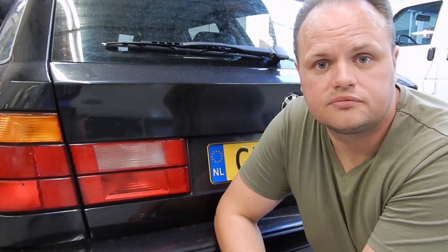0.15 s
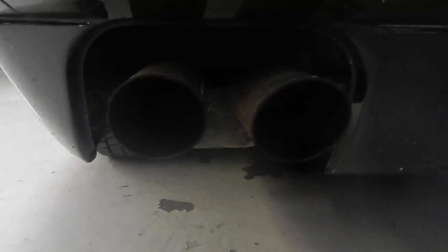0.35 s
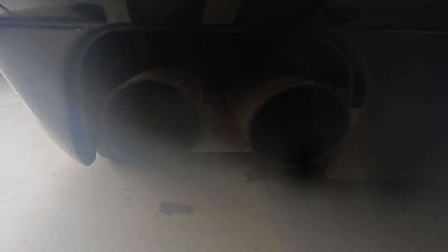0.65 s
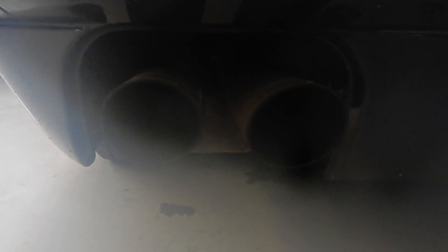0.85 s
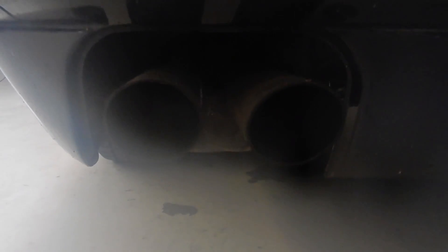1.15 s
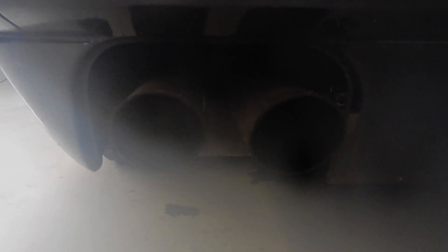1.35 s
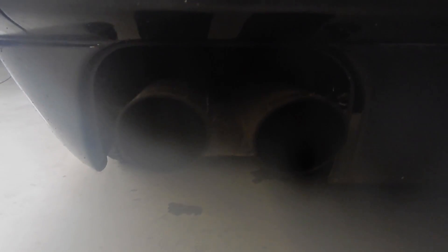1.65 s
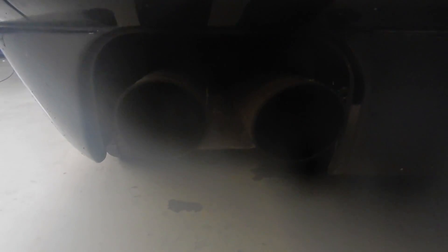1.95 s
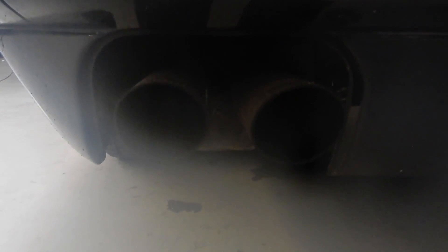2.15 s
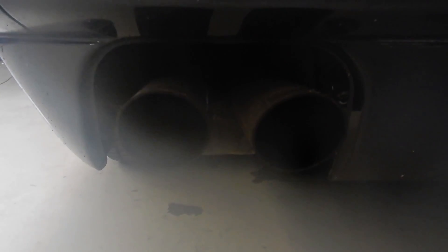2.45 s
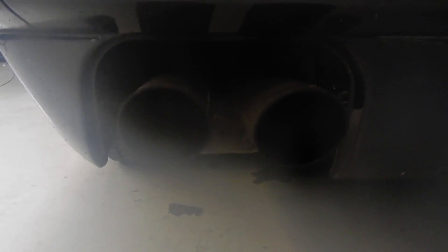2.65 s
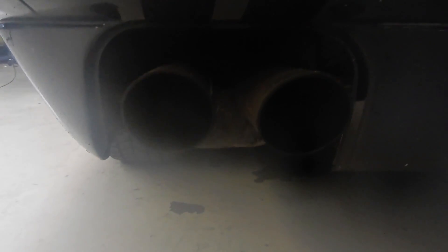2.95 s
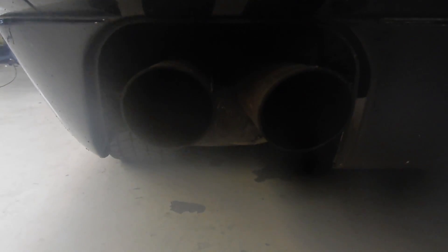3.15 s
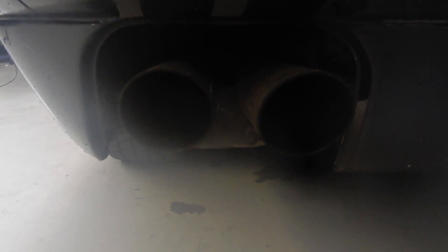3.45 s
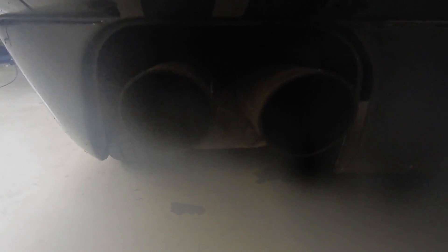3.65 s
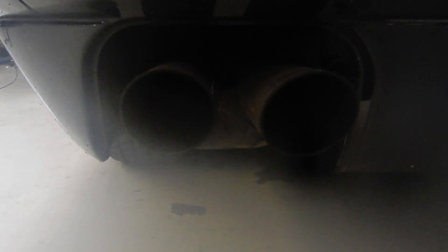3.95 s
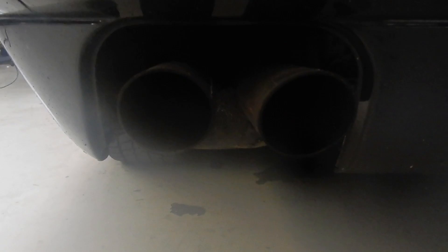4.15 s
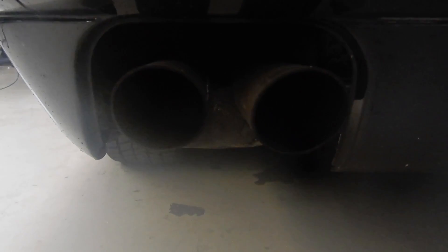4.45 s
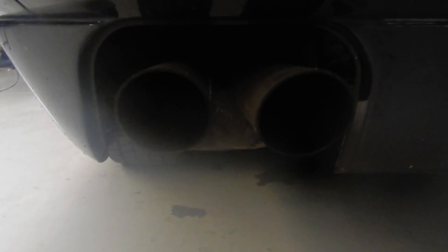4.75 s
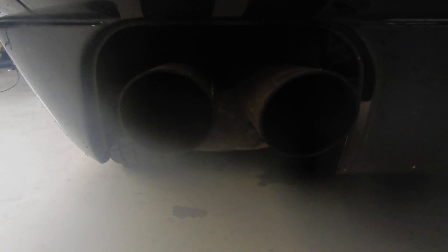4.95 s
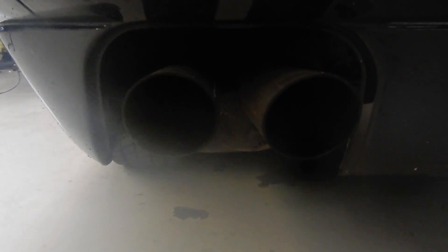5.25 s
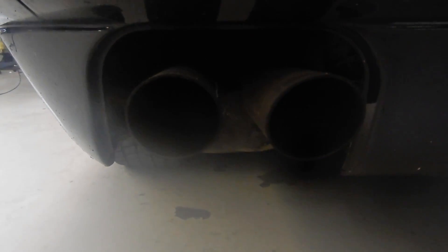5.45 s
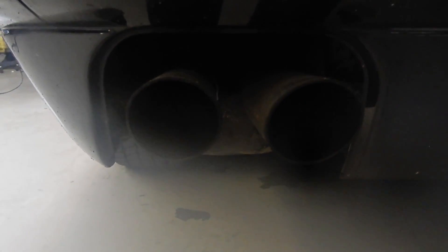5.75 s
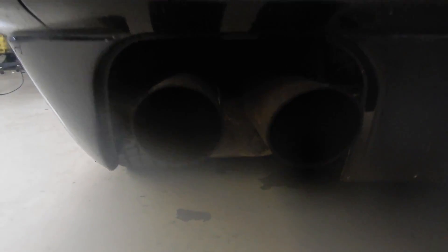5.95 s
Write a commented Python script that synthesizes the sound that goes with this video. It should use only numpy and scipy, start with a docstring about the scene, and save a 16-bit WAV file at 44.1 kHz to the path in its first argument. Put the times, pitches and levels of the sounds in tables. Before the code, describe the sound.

A car exhaust idles with a low throb and hiss, misfiring in bouts of deep thumps and puffs that buffet the microphone.

```python
"""A six-cylinder car throbs and hisses at idle, heard a hand's width behind its twin tailpipes.
Each exhaust beat rings the pipes under a steady hiss of gas. Soon the engine starts to misfire:
each miss slows the crank and gives a deep thump and a hollow hoot. About an eighth of a second later
a puff of gas buffets the microphone, and the limiter turns down the idle, which then swells back."""
import sys
import numpy as np
from scipy import signal
from scipy.fft import rfft, irfft
from scipy.io import wavfile
from scipy.ndimage import uniform_filter1d, minimum_filter1d

SR = 44100
rng = np.random.default_rng(int(sys.argv[2]) if len(sys.argv) > 2 else 0)


def unload_audio(sound):
    """Save the sound as a 16-bit wav file, at the path given as the first command line argument."""
    columns = np.transpose(np.atleast_2d(sound))
    # keep every value between -1 and 1, then stretch to whole-number steps
    steps = np.round(np.clip(columns, -1, 1) * 32767)
    wavfile.write(sys.argv[1], SR, steps.astype(np.int16))


N = 268524
T = np.arange(N) / SR
HZ = np.fft.rfftfreq(N, 1 / SR)


def amp(db):
    """Turns decibels into a gain."""
    return 10 ** (np.asarray(db) / 20)


def unit(x):
    """Scales a sound to an average (rms) level of 1."""
    return x / np.sqrt(np.mean(x ** 2) + 1e-20)


def read(points, hz):
    """Reads between the rows of a table, on a log-frequency axis."""
    f, value = np.transpose(points)
    return np.interp(np.log(hz + 1), np.log(f + 1), value)


def add(mix, s, sound):
    """Mixes a sound in, starting at s seconds."""
    part = mix[..., round(s * SR):][..., :sound.shape[-1]]
    part += sound[..., :part.shape[-1]]


def noise(gain, likeness):
    """Stereo noise with a given spectrum; a likeness of 1 makes left and right the same."""
    a, b = rfft(rng.standard_normal((2, 2 * len(gain) - 2)))
    likeness = np.clip(likeness, 0, 1)
    shared, apart = np.sqrt(1 + likeness) * a, np.sqrt(1 - likeness) * b
    return unit(irfft(np.array([shared + apart, shared - apart]) * gain))


def swell(t, rise):
    """Rises to 1 at the rise time, then dies away."""
    u = np.maximum(t, 0) / rise
    return (u * np.exp(1 - u)) ** 2


# thin, high tones across the pipe mouths: f/Hz, relative level/dB
WHISTLE_TONES = [(7693, -76), (8059, -79), (9157, -77), (9286, -78), (9641, -79), (10255, -79),
                 (11612, -78)]

def whistles(width_hz=26, level_db=-56):
    """Flowing gas faintly sounds narrow resonances across the pipe mouths."""
    peaks = sum(amp(db) / (1 + (2 * (HZ - hz) / width_hz) ** 2) for hz, db in WHISTLE_TONES)
    return amp(level_db) * noise(peaks, likeness=.52)


# when the pipe ticks: t/s, level/dB
TICKS = [(5.4559, -11.5)]
# the tones in a tick: f/Hz, level/dB, fade time/s
TICK_TONES = [(2350, -7, 0.0019), (3020, 1, 0.0017), (4100, -3, 0.00074), (5400, 1, 0.000398),
              (7500, -6, 0.0004)]

def ticks():
    """The pipe gives a short metallic snap."""
    out, t = np.zeros(N), T[:2048]
    snap = sum(amp(db) * np.exp(-t / fade) * np.sin(2 * np.pi * hz * t) for hz, db, fade in TICK_TONES)
    for s, db in TICKS:
        add(out, s, amp(db) * snap)
    return out


# misfires, in bouts of one every engine cycle: t/s, thump level/dB, spit and hoot level/dB
MISFIRES = [(.528, 2, -2.5), (.7, 2, 2), (.873, 3, 1), (1.212, 2, -2), (1.385, 1, 0), (1.558, 4, -1),
            (1.727, 1.5, -2.5), (1.902, 1.5, -1.5), (2.074, 1.5, -2), (2.242, 3, 0), (2.418, 3, 0.5),
            (2.591, 2.5, 1.5), (2.762, 2, -0.5), (2.932, 3, 0.5), (3.579, 2, -2), (3.747, 3, -0.5),
            (4.077, 1.5, 2), (4.246, 2.5, 0.5), (4.414, 2.5, -2), (4.751, 2, -2), (4.919, 1, 0.5),
            (5.083, 2, -2)]
MISFIRE_TIMES = np.transpose(MISFIRES)[0]
IDLE_CYCLE_S, MISFIRE_CYCLE_S = .156, .171  # a cycle takes longer when a cylinder misses

def beat_times():
    """Three strong beats a cycle; the crank is slow in a bout and takes one cycle to speed up again."""
    changing_s = (IDLE_CYCLE_S + MISFIRE_CYCLE_S) / 2
    bout_ends = MISFIRE_TIMES[np.diff(MISFIRE_TIMES, append=np.inf) > 1.5 * MISFIRE_CYCLE_S]
    # a whole number of cycles passes between one mark and the next
    marks = sorted([MISFIRE_TIMES[0] - changing_s, *MISFIRE_TIMES, *(bout_ends + changing_s)])
    marks.append(marks[-1] + IDLE_CYCLE_S * np.ceil((T[-1] - marks[-1]) / IDLE_CYCLE_S))
    cycles = np.cumsum(np.round(np.diff(marks, prepend=marks[0]) / IDLE_CYCLE_S))
    return np.interp(np.arange(3 * cycles[-1]) / 3, cycles, marks)


def stumble_db(s, weak_db=-5):
    """The two beats that follow a misfire are weak."""
    since = s - MISFIRE_TIMES
    return weak_db * np.any((since > MISFIRE_CYCLE_S / 6) & (since < MISFIRE_CYCLE_S * 5 / 6))


# pitches at which the steel pipe ends ring: f/Hz, width/Hz, boost/dB
STEEL_RINGS = [(1215, 45, 6), (2066, 70, 1.5), (2257, 60, 3), (2580, 70, 3.5), (3756, 40, 3), (4640, 30, 4)]

def tailpipe(round_trip_hz=253, loss_hz=2200):
    """Echoes between the pipe's ends boost evenly spaced pitches; the steel adds its own."""
    echo = .54 / (1 + (HZ / loss_hz) ** 2)  # weaker in the treble
    steel_db = sum(db / (1 + (2 * (HZ - hz) / width) ** 2) for hz, width, db in STEEL_RINGS)
    return amp(steel_db) / abs(1 - echo * np.exp(-2j * np.pi * HZ / round_trip_hz))


# tone of the gas (low rush, bright hiss, steady top fizz, short spit): f/Hz, relative level/dB
RUSH_TONE = [(25, -43.5), (70, 5), (150, 1.5), (260, -18.5), (320, -3), (390, 2.5), (500, -11), (660, -6),
             (760, -18.5), (880, -8), (1010, -21.5), (1110, -8), (1230, -18), (1370, -47), (2000, -56.5)]
HISS_TONE = [(900, -14.5), (1400, 2.5), (1600, 4.5), (2250, 10), (2700, 8.5), (3500, 8.5), (5000, 1.5),
             (5500, -8), (7500, -36.5), (15000, -53)]
FIZZ_TONE = [(3500, -3.5), (5500, 3.5), (7500, 0), (11800, -5), (15000, -13)]
SPIT_TONE = [(200, -19.5), (700, -6), (1400, -7), (2500, 2.5), (3200, 0), (3700, -2.5), (5000, -8),
             (8000, -21.5), (15000, -44.5)]
# the slow drift of the hiss: t/s, level/dB
HISS_DRIFT = [(.36, -0.5), (.65, 2.5), (1.05, -3), (1.45, 0.5), (1.65, -1.5), (2.6, -1), (3.2, -1.5),
              (3.7, 1.5), (4.2, 1.5), (4.6, -1), (5.3, -1.5), (5.8, 1)]
# how alike the gas sounds left and right: f/Hz, likeness squared/0-1
GAS_LIKENESS = [(60, 0.81), (600, 0.95), (3000, 0.97), (4500, 0.83), (7000, 0.12), (15000, 0.14)]
# spits of gas after each misfire: delay/s, rise time/s, strength/ratio
SPITS = [(0.004, 0.0079, 0.8), (0.0447, 0.0058, 2.0), (.11, .005, .3)]
# the first misfire of most bouts coughs out more gas: t/s, level/dB
COUGHS = [(.526, -6), (3.576, -3.5), (4.074, -6), (4.747, -1)]

def gas(rush_db=-31, hiss_db=-36.5, fizz_db=-42, spit_db=-33, ripple_db=.76):
    """Swirling gas leaves the pipes, throbbing with the beats and spitting after each misfire."""
    t, throbs, spits = T[:SR // 8], np.zeros(N), np.zeros(N)
    for s in beat_times():
        add(throbs, s, swell(t, rise=.0092))
    for s, _, db in MISFIRES:
        for delay, rise, strength in SPITS:
            add(spits, s + delay, amp(db) * strength * swell(t, rise))
    for s, db in COUGHS:
        add(spits, s, amp(db) * swell(t, rise=.0068))
    likeness = np.sqrt(np.clip(read(GAS_LIKENESS, HZ), 0, 1))
    # standing waves in the silencer ripple the tailpipe's resonances
    ripple = unit(uniform_filter1d(rng.standard_normal(len(HZ)), size=200))
    colour = tailpipe() * amp(ripple_db * ripple)
    rush, hiss, fizz, spit = (noise(amp(read(tone, HZ)) * colour, likeness)
                              for tone in (RUSH_TONE, HISS_TONE, FIZZ_TONE, SPIT_TONE))
    drift_db = np.interp(T, *np.transpose(HISS_DRIFT))
    rush *= amp(rush_db) * (1 + .11 * throbs + .4 * spits)
    hiss *= amp(hiss_db + drift_db) * (1 + .22 * throbs)
    return rush + hiss + amp(fizz_db) * fizz + amp(spit_db) * spit * spits


# tone of the gas shoved out by a beat: f/Hz, relative level/dB
CHUG_TONE = [(60, -32.5), (110, -5), (180, 10), (215, -11.5), (265, -3.5), (320, -10), (420, -27.5),
             (500, -16), (620, -18), (1400, -54.5)]
# the three uneven beats of a cycle: level/dB
CHUG_LEVELS = [-21, -22, -32]

def chugs(rise_s=.014, lead_s=.002):
    """Each beat shoves out a short, hollow burst of gas."""
    out, t = np.zeros((2, N)), T[:4096]
    colour = amp(read(CHUG_TONE, np.fft.rfftfreq(len(t), 1 / SR)))
    shape = swell(t, rise_s)
    shape_rms = np.sqrt(np.mean(shape ** 2))
    for k, s in enumerate(beat_times()):
        burst = shape_rms * unit(noise(colour, likeness=.97) * shape)
        db = CHUG_LEVELS[k % len(CHUG_LEVELS)] + stumble_db(s)
        add(out, s - lead_s, amp(db) * burst)
    return out


# surges of gas after each misfire: delay/s, rise time/s, level/dB
SURGES = [(.007, .014, -1.5), (.044, .02, -4)]
# overtones of the tailpipe: f/Hz, level/dB
HOOT_TONES = [(510, -26), (762, -32), (1015, -39), (1222, -39.5)]

def hoots(scatter_db=2, detune=.012):
    """The surges of a misfire blow the overtones of the tailpipe: a hollow hoot."""
    out, t = np.zeros(N), T[:SR // 6]
    for s, _, db in MISFIRES:
        for delay, rise, surge_db in SURGES:
            tones = np.zeros(len(t))
            for hz, tone_db in HOOT_TONES:
                louder, sharper, phase = rng.standard_normal(3)
                wave = np.sin(2 * np.pi * (hz * (1 + detune * sharper) * t + phase))
                tones += amp(tone_db + scatter_db * louder) * wave
            add(out, s + delay, amp(db + surge_db) * swell(t, rise) * tones)
    return out


# deep tones of the exhaust pipe: f/Hz, rise time before stretching/s, beat level/dB, thump level/dB
PIPE_TONES = [(36.8, 0.019, -24, -14.5), (53.6, 0.012, -15.5, -4.23), (114.3, 0.03, -28.5, -22),
              (169.9, 0.009, -19.5, -16), (232.5, 0.01, -24.5, -22.5), (258.7, 0.02, -26.5, -23.5)]

def pipe_ring(levels_db, scatter_db, detune=.018, stretch=1.49):
    """One push of gas rings all the pipe's deep tones, never quite the same way twice."""
    t = T[:SR // 8]
    ring = np.zeros(len(t))
    for (hz, rise, _, _), db in zip(PIPE_TONES, levels_db):
        louder, sharper = rng.standard_normal(2)
        wave = np.sin(2 * np.pi * hz * (1 + detune * sharper) * t)
        ring += amp(db + scatter_db * louder) * swell(t, stretch * rise) * wave
    return ring


def engine(strong_db=1, weak_db=-13, beat_lead_s=.01119, weak_lag_s=.0155, thump_lead_s=.0065):
    """A strong and a weak bank of cylinders take turns; a misfire swaps a strong beat for a thump."""
    out = np.zeros(N)
    _, _, beat_db, thump_db = np.transpose(PIPE_TONES)
    for s in beat_times():
        fires = abs(MISFIRE_TIMES - s).min() > .02
        strong_beat = pipe_ring(beat_db + strong_db + stumble_db(s), scatter_db=1)
        add(out, s - beat_lead_s, fires * strong_beat)
        add(out, s + weak_lag_s, pipe_ring(beat_db + weak_db, scatter_db=2))
    for s, db, _ in MISFIRES:
        add(out, s - thump_lead_s, pipe_ring(thump_db + db, scatter_db=-.9))
    return out


# rumble of eddies (small swirls of gas) at an eddy pitch of 300 Hz: f/Hz, relative level/dB
BUFFET_TONE = [(15, -35.5), (50, 1), (110, 7.5), (200, 10.5), (450, 2), (750, -10), (1150, -29.5),
               (1700, -31.5), (2600, -63), (6000, -87), (12000, -105)]
# colour that the pipe mouth and the microphone's two openings give each puff: f/Hz, boost/dB
PORT_TONE = [(400, 0), (510, 2), (630, -1), (760, 3), (900, 1), (1190, 4), (1380, -13), (1750, -7),
             (2600, -12)]
# sharp edge of a hard puff: f/Hz, relative level/dB
CRACK_TONE = [(700, -16), (1400, -2.5), (1750, 18.5), (2300, -20), (3000, -16), (5000, -13), (15000, -75.5)]
# puffs on the microphone: t/s, peak level/dB, length/s, left minus right/dB, left lag/s,
# eddy pitch/Hz, crack level against the puff/dB, boom pitch/Hz, boom share/0-1
PUFFS = [(.667, 9.5, .032, 5.5, 0.0033, 260, -51, 207, 0.15),
         (.686, 4, .014, -16, -0.0064, 340, -34, 244, 0.08),
         (.817, 13.5, .024, 9, 0.00049, 280, -30, 206, 0.02),
         (.849, 8, .021, 5.5, 0.0014, 237, -49, 314, 0.21),
         (1.003, 16, 0.025, -2.5, 0.0038, 335, -33, 215, 0.31),
         (1.349, 7.5, .01, -3.5, 0.0062, 262, -41, 216, 0.38),
         (1.366, 1.5, .022, -5.5, 0.0094, 279.6, -36, 286, 0.14),
         (1.498, 0, .012, -8, 0.0077, 325, -34, 474, 0.6),
         (1.51, 21.5, .017, -2, .001, 440, -17, 463, 0.11),
         (1.686, 12.5, .027, -7.5, 0.013, 278, -46, 183, 0.31),
         (1.847, 16.5, .029, -2.5, -0.0059, 340, -27.5, 367, 0.07),
         (2.019, 16.5, .022, -11, -0.0028, 313, -29.5, 495, 0.05),
         (2.034, 9.5, .016, -0.5, 0.0033, 325, -24, 182, 0),
         (2.189, 22, .02, -1.5, 0.0019, 380, -17, 310, 0.1),
         (2.364, 21.5, .022, -10.5, 0.0047, 322, -21, 350, 0.11),
         (2.534, 23, .021, -15, 0.00015, 336, -19.5, 549, 0.23),
         (2.552, 10.5, .014, -1, -0.00041, 360, -31, 624, .2),
         (2.729, 13, .028, -3, 0.0066, 300, -42, 190, 0.13),
         (2.864, 6, .021, -10, -0.0022, 290, -36, 332, 0.26),
         (2.885, 18, .025, -5, 0.0016, 330, -28.5, 487, 0),
         (3.064, 18.5, .016, -13, -0.0021, 420, -24, 360, 0.13),
         (3.087, 3.5, .023, 24, 0.0078, 290, -43, 174, 0.9),
         (3.731, 5.5, 0.019, 4, 0.0002, 285, -32, 244, 0.03),
         (3.873, 8.5, .035, -3.5, 0.003, 270, -37.5, 304, .05),
         (3.891, 4, 0.021, 3.5, 0.0011, 250, -39.5, 299, 0.15),
         (4.213, 15.5, .024, -1, 0.0046, 395, -18, 380, 0.14),
         (4.362, 9, .025, -5.5, 0.0022, 284, -38, 447, 0.18),
         (4.383, 13.5, .015, -13.5, 0.0032, 305, -51, 484, 0),
         (4.536, 21, .018, -10, 0.0014, 390, -27, 170, 0.73),
         (4.895, 9.5, 0.035, -5, 0.01, 285, -44, 233, 0.13),
         (5.03, 17.5, .022, -0.5, 0.00078, 255, -26, 396, 0.14),
         (5.209, 18.5, .025, -7, 0.0032, 270, -43, 181, .35),
         (5.236, 5, .03, -10, 0.012, 280, -38, 408, 0.47)]

def puffs(sputter_hz=140, sputter_db=3.2, boom_wander_rad=.78, fringe_pitch_ratio=.52):
    """Each slug of gas sputters across the microphone; swirls shed at an even pace make it boom."""
    out, t = np.zeros((2, N)), np.arange(-4096, 4096) / SR
    hz, steps = np.fft.rfftfreq(len(t), 1 / SR), np.arange(len(t))
    likeness = 1 / (1 + (hz / 70) ** 2)  # only the largest eddies reach both sides alike
    for s, db, length, pan_db, lag, eddy_hz, crack_db, boom_hz, boom_share in PUFFS:
        scaled_hz = hz * 300 / eddy_hz
        side_t = t - np.array([[lag], [-lag]]) / 2
        core = swell(side_t + .4385 * length, rise=.38 * length)  # arrives abruptly and trails off
        # a softer, duller fringe surrounds the slug and lingers in its wake
        fringe = .14 * np.exp(-(side_t / length) ** 2) + .12 * swell(side_t, rise=.021)
        sputter = noise(np.exp(-(hz / sputter_hz) ** 2), likeness=.456)
        gusts = amp(sputter_db * sputter)
        eddies = noise(amp(read(BUFFET_TONE, scaled_hz)), likeness)
        # in every gust the eddies pass faster and louder
        eddies = np.array([np.interp(np.cumsum(speed), steps, side, period=len(t))
                           for speed, side in zip(gusts ** .4, eddies)])
        dull_eddies = noise(amp(read(BUFFET_TONE, scaled_hz / fringe_pitch_ratio)), likeness)
        buffet = core * gusts * eddies + fringe * dull_eddies
        buffet = irfft(rfft(buffet) * amp(read(PORT_TONE, hz)))
        buffet = np.array([unit(side) for side in buffet])
        boom = core * np.sin(2 * np.pi * (boom_hz * t + rng.random()) + boom_wander_rad * sputter)
        puff = np.sqrt(1 - boom_share) * buffet + np.sqrt(boom_share) * unit(boom)
        puff /= abs(puff).max(1, keepdims=True)
        # the highest crests break into a crack
        crack = amp(crack_db) * abs(puff) ** 4 * noise(amp(read(CRACK_TONE, hz)), likeness)
        side_gains = amp(db + np.minimum([[pan_db], [-pan_db]], 0))
        add(out, s + t[0], side_gains * (puff + crack))
    return out


def scene():
    """Everything that reaches the left and right sides of the microphone."""
    return engine() + chugs() + hoots() + gas() + whistles() + puffs() + ticks()


def record(dry, start_s=.364, stop_s=5.852, ceiling_db=-1, release_db_per_s=21, first_duck_db=11):
    """A limiter ducks (turns down) loud peaks at once and recovers slowly; extreme pitches are cut."""
    low_cut_hz, high_cut_hz = 18, 15300
    dry = signal.sosfilt(signal.butter(1, low_cut_hz, "high", fs=SR, output="sos"), dry)
    audible = (T > start_s) & (T < stop_s)
    over_db = 20 * np.log10(abs(dry * audible).max(0) + 1e-9) - ceiling_db
    over_db = np.where(T < start_s, first_duck_db, np.maximum(over_db, 0))  # starts already ducked
    recovered_db = release_db_per_s * T
    duck_db = np.maximum.accumulate(over_db + recovered_db) - recovered_db
    held_db = minimum_filter1d(-duck_db, size=100)  # looks about a millisecond ahead
    gain_db = uniform_filter1d(uniform_filter1d(held_db, size=56), size=44)
    fade = uniform_filter1d(audible * 1., size=130)
    low_pass = signal.firwin(511, high_cut_hz, window=("kaiser", 9), fs=SR)
    return signal.oaconvolve(dry * amp(gain_db) * fade, low_pass[None], "same")


dry = scene()
out = record(dry)
unload_audio(out)
```